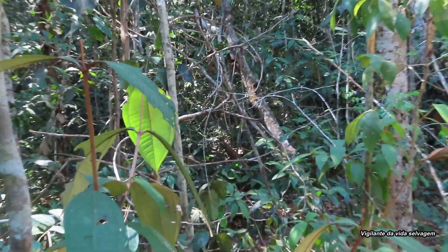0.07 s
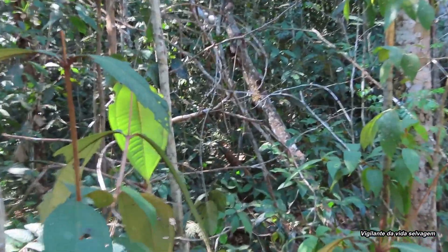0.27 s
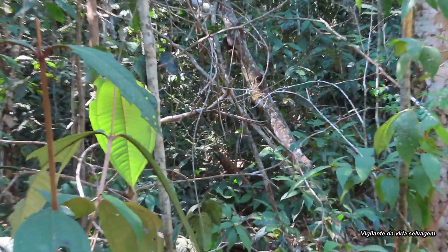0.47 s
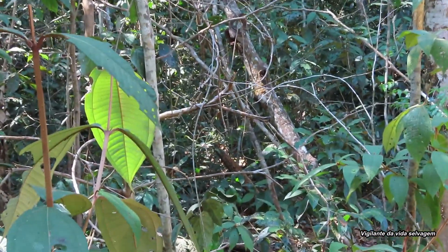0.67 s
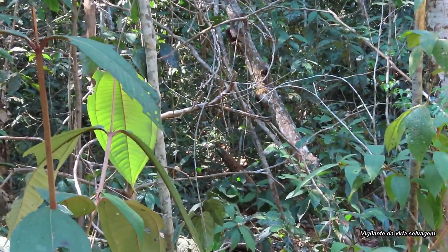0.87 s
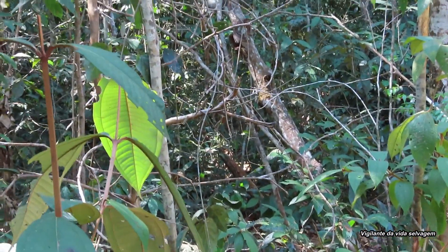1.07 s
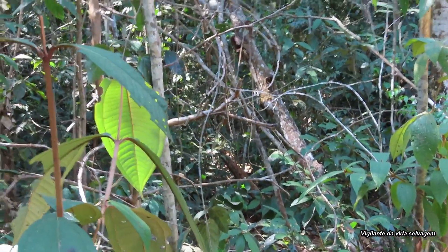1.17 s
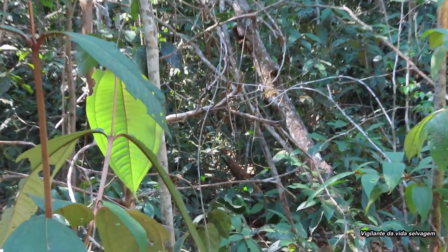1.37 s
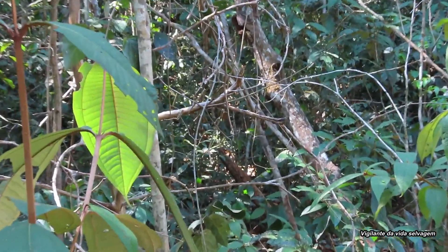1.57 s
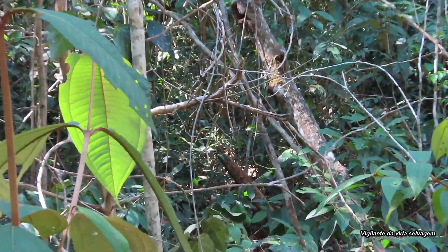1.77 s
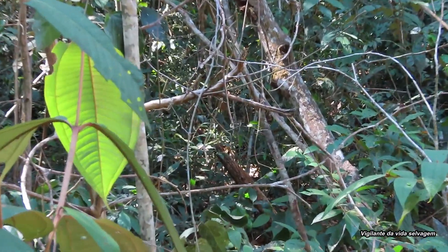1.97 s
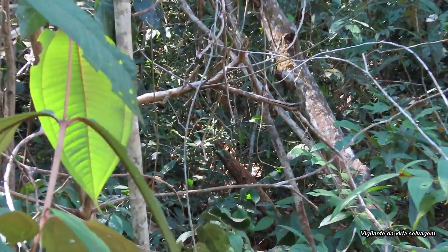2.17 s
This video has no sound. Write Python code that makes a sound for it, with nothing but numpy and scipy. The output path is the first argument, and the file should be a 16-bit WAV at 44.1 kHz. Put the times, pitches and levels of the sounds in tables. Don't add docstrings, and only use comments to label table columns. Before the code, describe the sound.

Small monkeys squeak close to a stereo microphone in echoing forest. Thin whistles rise and break into falling chirps at 0.2, 0.5 and 0.8 seconds; a loud hoarse bark follows at 0.95. Short faint whistles come around 1.1, a twig snap at 1.27, a distant call at 1.4, a harsh chirp at 1.6, a high squeak at 1.76, then weak calls until 2.25. Leaf hiss, low wind and insect tones continue.

```python
import sys
import numpy as np
from scipy import signal
from scipy.fft import rfft, irfft, next_fast_len
from scipy.io import wavfile
from scipy.ndimage import uniform_filter1d

SR = 44100
rng = np.random.default_rng(int(sys.argv[2]) if len(sys.argv) > 2 else 0)


def volts_from_decibels(level):
    exponent = np.asarray(level, float) / 20
    return 10 ** exponent


def output_pcm(signal):
    pcm = np.clip(np.atleast_2d(signal).T, -1, 1) * 32767
    wavfile.write(sys.argv[1], SR, np.round(pcm).astype(np.int16))


N = 99225

# (frequency [Hz], level [dB per Hz])
AIR_SPECTRUM = [(15, -70), (25, -11), (122, -8.5), (399, -9.5), (537, -16), (3340, -24), (5280, -27),
                (7100, -27), (15500, -58.5)]
# (frequency [Hz], likeness [0-1])
AIR_LIKENESS = [(30, 0.83), (90, 0.85), (300, 0.25), (1000, 0.95), (4000, 0.89), (9000, 0.25)]
# (width [s], boost [dB], below [Hz])
GUST_SHAPE = (0.14, 6, 410)
# (width [s], boost [dB], above [Hz])
LEAF_STIR = (0.39, 14.3, 770)
# (pitch [Hz], width [Hz], level [dB], throb rate [1/s], throb depth [0-1], steady share [0-1])
INSECT_VOICES = [
    (3253, 100, -47.5, 6.1, 0.57, 0.52),
    (7042, 200, -45.5, 290, 0.59, 0.4),
]
# (time [s], level [dB], pitch [Hz])
WIND_KNOCKS = [(.1, -47.5, 120), (0.211, -52.5, 109), (0.381, -49.5, 117), (.44, -53.5, 125),
               (.54, -46, 117), (0.599, -46, 105), (0.536, -49.5, 257), (0.588, -48.5, 294),
               (.65, -53.5, 242), (1.2, -58.5, 80), (1.28, -57, 148), (1.33, -52, 70), (1.699, -54, 93)]
# (time [s], pitch [Hz], level [dB])
EARLY_WHISTLES = [
    [(.212, 4115, -39), (.226, 4300, -37.5), (.238, 4400, -25), (.254, 4494, -29.5), (.268, 4503, -23),
     (.285, 4438, -23.5), (.294, 4450, -44), (.3, 4510, -19.5), (.311, 4030, -37)],
    [(.49, 4125, -51), (.498, 4205, -37.5), (.516, 4330, -44), (.53, 4356, -25), (.554, 4422, -29),
     (.565, 4250, -28.5)],
    [(.79, 4120, -39.5), (.82, 4250, -34.5), (.841, 4410, -27.5), (.846, 4396, -46), (.851, 4350, -25.5),
     (.862, 4366, -28), (.879, 4331, -23.5), (.89, 4420, -39), (.897, 4170, -38)],
    [(1.094, 3020, -21), (1.102, 3090, -47), (1.116, 3220, -29.5)],
    [(1.118, 3765, -41), (1.128, 3790, -29.5), (1.152, 3710, -27.5), (1.176, 3873, -35.5),
     (1.194, 3920, -38), (1.214, 4000, -34), (1.234, 4250, -34), (1.252, 4222, -37.5)],
]
LATE_WHISTLES = [
    [(1.552, 3940, -40), (1.56, 4160, -32), (1.572, 4134, -33.5), (1.584, 4200, -26), (1.59, 4206, -39),
     (1.595, 4217, -28.5), (1.608, 4270, -31.5), (1.624, 4410, -45)],
    [(1.76, 6230, -38), (1.77, 6065, -31), (1.788, 6084, -26.5), (1.802, 6070, -52), (1.817, 6080, -26.5),
     (1.83, 5960, -34.5), (1.838, 5840, -30), (1.846, 5930, -30.5), (1.856, 5660, -35)],
    [(2.105, 5760, -46), (2.115, 5685, -42.5), (2.14, 5730, -47), (2.149, 5500, -34), (2.154, 4950, -47),
     (2.162, 3100, -45)],
    [(2.24, 3800, -51), (2.246, 4000, -42), (2.25, 4130, -35)],
    [(1.904, 2543, -35), (1.914, 2510, -34), (1.92, 2460, -30), (1.926, 2485, -44)],
]
OCTAVE_LEVELS = [-13, -13, -7, -29, -7.5, -13, -26, -38, -21, -6]
OCTAVE_GROWTHS = [18, 1.7, 2, 3.4, 5.6, 4.5, 9, 14, 3, 3]
# (time [s], pitch [Hz], level [dB], roughness [0-1])
EARLY_CHIRPS = [
    [(.308, 2196, -41, 0), (.313, 1996, -16, 0.2), (.32, 1543, -22, 0.25), (.33, 1076, -34, 0)],
    [(.558, 2551, -18.5, 0.29), (.564, 2447, -17, 0), (.582, 2461, -15, 0), (.594, 2389, -22.5, 0),
     (.604, 2034, -17, 0.21), (.612, 1212, -27.5, 0), (.622, 1178, -26, 0.13)],
    [(.895, 2471, -17, 0.42), (.9, 2295, -16, 0.14), (.91, 1965, -23, 0.06), (.918, 1507, -18, 0.19),
     (.925, 1064, -19.5, 0.14)],
]
LATE_CHIRPS = [
    [(1.305, 2330, -34, 0.061), (1.316, 1908, -31.5, 0.028), (1.326, 1334, -46, 0.27),
     (1.336, 780, -36.5, 0.17)],
    [(1.625, 2382, -20.5, 1), (1.631, 1734, -21, 0.38), (1.637, 1387, -19, 0.61), (1.646, 1044, -22, 0.33)],
    [(2.158, 1866, -34.5, 0.29), (2.166, 1456, -33.5, 0.89), (2.176, 1063, -30.5, 0.28)],
]
CHIRP_TILTS = [-1, -2.5, -2, -6, -4, -1]
# (frequency [Hz], level [dB])
THROAT_SPECTRUM = [(1000, 4), (1900, -7), (2700, -11), (3600, -0.5), (5000, 0), (6800, 2), (9500, -17),
                   (11500, -26.5), (16000, -78)]
# (time [s], length [s], pitch [Hz], level [dB], roughness [0-1])
HOARSE_BARKS = [
    (0.341, 0.019, 992, -32.5, 0),
    (.946, 0.025, 850.4, -10, 0.34),
    (1.598, 0.036, 791, -29.5, 0.46),
    (1.926, .05, 1053, -23.5, 0.21),
    (2.162, 0.036, 885, -35.5, 0.35),
    (0.361, 0.067, 1800, -47, 0),
]
BARK_THROBS = [40, 80, 58, 46.3, 70, 30.4]
# (time [s], pitch [Hz], level [dB], roughness [0-1])
DISTANT_CALLS = [
    [(1.386, 2400, -20, 0.56), (1.4, 2410, -28, 0.56), (1.425, 2410, -36.5, 0.31), (1.5, 2433, -42.5, 0.07)],
    [(.725, 2290, -31, .8), (.74, 1530, -47, 1)],
]
# (level [dB], pitch [Hz], width [Hz])
TWIG_SNAP = (-34, 6800, 2700)
# (frequency [Hz], time to fall 60 dB [s])
FOREST_DECAY = [(500, 1), (1000, 1), (4500, 1), (7000, 1), (12000, 0.14)]
# (frequency [Hz], likeness [0-1])
FOREST_LIKENESS = [(700, 1), (3000, .93), (6000, 0.83), (9000, 0.13)]
# (frequency [Hz], level [dB])
MIC_RESPONSE = [(8800, 0.5), (9600, 2), (15300, 9.5), (15700, -74)]


def evened(x):
    return x / np.sqrt(np.mean(abs(x) ** 2) + 1e-20)


def read(points, hz):
    f, value = np.transpose(points)
    return np.interp(np.log(hz + 1), np.log(f + 1), value)


def add(mix, s, sound):
    part = mix[round(s * SR):][:len(sound)]
    part += sound[:len(part)]


def resonate(x, hz, width_hz):
    turn = np.exp(2j * np.pi * hz * np.arange(x.shape[-1]) / SR)
    r = np.exp(-np.pi * width_hz / SR)
    smooth = signal.lfilter([1 - r], [1, -r], x / turn)
    smooth = signal.lfilter([1 - r], [1, -r], smooth)
    return 2 * (turn * smooth).real


def unfold(rows, edge_s):
    s, *columns = np.transpose(rows)
    t = np.arange(s[0], s[-1], 1 / SR)
    ends = np.clip(np.minimum(t - s[0], s[-1] - t) / edge_s, 0, 1)
    return s[0], [np.interp(t, s, c) for c in columns], ends * np.sqrt(2)


def air():
    level_db, patchy_db, gust_s, stir_s = -48, 1.8, 0.52, 1.3
    frames, hz = N // 256 + 5, np.fft.rfftfreq(1024, 1 / SR)[:, None]
    t = np.arange(frames) * 256 / SR
    a, b, c, d, patches = rng.standard_normal((frames, 513, 5)).T
    patches = uniform_filter1d(patches, size=8, axis=0)
    patches = evened(uniform_filter1d(patches, size=12, axis=1))

    width_s, boost_db, below_hz = GUST_SHAPE
    gust = boost_db * np.exp(-((t - gust_s) / width_s) ** 2) / (1 + (hz / below_hz) ** 4)
    width_s, boost_db, above_hz = LEAF_STIR
    stir = boost_db * np.exp(-((t - stir_s) / width_s) ** 2) / (1 + (above_hz / (hz + 1)) ** 2)

    same = read(AIR_LIKENESS, hz)
    left = a + 1j * b
    right = same * left + np.sqrt(1 - same ** 2) * (c + 1j * d)
    z = np.array([left, right]) * volts_from_decibels(read(AIR_SPECTRUM, hz) + patchy_db * patches + gust + stir)
    x = signal.istft(z, nperseg=1024, noverlap=768)[1][:, :N]
    return volts_from_decibels(level_db) * x / np.sqrt(np.mean(x[:, :9000] ** 2))


def insect(hz, width_hz, db, rate, depth, steady):
    same, early_db = 0.67, -7.5
    a, b, drift = rng.standard_normal((3, N))
    drift = evened(uniform_filter1d(drift, size=2000))
    right = same * a + np.sqrt(1 - same ** 2) * b
    buzz = evened(resonate(np.array([a, right]), hz, width_hz))
    core = np.sqrt(2) * np.sin(2 * np.pi * np.cumsum(hz * (1 + 0.002075 * drift)) / SR)
    throb = 1 + depth * np.sin(2 * np.pi * np.cumsum(rate * (1 + 0.45 * drift)) / SR)
    swell = volts_from_decibels(db + early_db * np.clip(1 - 2 * np.arange(N) / SR, 0, 1))
    return swell * throb * (steady * core + (1 - steady) * buzz)


def buffet(s, db, hz):
    half_s = 0.035
    t = np.arange(0, 2 * half_s, 1 / SR)
    return s - half_s, volts_from_decibels(db) * 2 * np.hanning(len(t)) * np.sin(2 * np.pi * hz * t)


def whistle(rows, octave_db, growth_db):
    start, (hz, db), ends = unfold(rows, edge_s=0.0023)
    phase = 2 * np.pi * np.cumsum(uniform_filter1d(hz, size=200)) / SR
    octave = volts_from_decibels(octave_db + growth_db * np.linspace(-.5, .5, len(hz))) * np.sin(2 * phase)
    third = volts_from_decibels(db - 20) * np.sin(3 * phase)
    return start, ends * volts_from_decibels(db) * (np.sin(phase) + octave + third)


def forest(x):
    early_db, early_s, mottle_db = -3, 0.02, 3.5
    taps = np.zeros((2, SR))
    at = np.arange(100, SR - 20, 20) + rng.integers(0, 20, (2, (SR - 101) // 20))
    np.put_along_axis(taps, at, rng.choice([-1., 1.], at.shape), 1)
    hz, t, z = signal.stft(taps, SR, nperseg=256)
    late = volts_from_decibels(-60 * t / read(FOREST_DECAY, hz)[:, None])
    early = volts_from_decibels(early_db + 14.5) * np.exp(-t / early_s)
    spread = np.array([np.ones_like(hz), np.sqrt(1 - read(FOREST_LIKENESS, hz))])
    mottle = evened(uniform_filter1d(rng.standard_normal(z.shape[1:]), size=6))
    fade = (late + early) * spread[:, :, None] * volts_from_decibels(mottle_db * mottle)
    mid, side = signal.istft(z * fade, SR, nperseg=256)[1]
    tail = np.array([mid + side, mid - side]) / np.linalg.norm(mid)
    return signal.fftconvolve(x[None], tail, axes=1)[:, :N]


def chirp(rows, tilt_db):
    start, (hz, db, rough), ends = unfold(rows, edge_s=0.00081)
    wobble = evened(uniform_filter1d(rng.standard_normal(len(hz)), size=40))
    glide = uniform_filter1d(hz, size=100) * (1 + 0.089 * rough * wobble)
    phase = 2 * np.pi * np.cumsum(glide) / SR

    k = np.arange(1, 25)[:, None] / 2
    share = np.where(k % 1, volts_from_decibels(-7.5) * rough, 1) * volts_from_decibels(tilt_db * np.maximum(k - 2, 0))
    share = share * (k * hz < 15000) * (k * hz > 700)
    partials = share * volts_from_decibels(read(THROAT_SPECTRUM, k * hz)) * np.cos(k * phase + k ** 2)
    tone = evened(partials.sum(0))

    f = np.fft.rfftfreq(len(hz), 1 / SR)
    breath = rfft(rng.standard_normal(len(hz)))
    hiss = evened(irfft(breath * volts_from_decibels(read(THROAT_SPECTRUM, f)) * (f > 900), len(hz)))
    return start, ends * volts_from_decibels(db) * ((1 - rough) * tone + rough * hiss) / np.sqrt(2)


def bark(start, length, hz, db, rough, throb_hz):
    rise_s, sag, throb_depth = 0.00654, 0.1, 0.7
    fade_db, puff_db, puff_fade_db = -2.5, -6, -16
    t = np.arange(0, length + .01, 1 / SR)
    a, b, c = rng.standard_normal((3, len(t) + 2000))

    cycle = (throb_hz * np.maximum(t - rise_s / 2, 0)) % 1
    throb = 1 + throb_depth * np.sin(2 * np.pi * cycle ** .5)
    tone = throb * np.sin(2 * np.pi * hz * np.cumsum(1 + sag * (.5 - t / length)) / SR)
    low = evened(resonate(resonate(a, hz, 1520), 0.93 * hz, 1080 * rough + 40))[2000:]
    upper = evened(resonate(b, 2.38 * hz, 510))[2000:]
    puff = resonate(resonate(resonate(c, 4540, 5400), 4800, 7600), 2800, 6400)
    puff = volts_from_decibels(puff_db + puff_fade_db * t / length) * evened(puff)[2000:]

    shape = np.clip(t / rise_s, 0, 1) ** 2 * np.clip((length + 0.0095 - t) / 0.036, 0, 1)
    voice = (1 - rough) * tone + rough * (low + upper) + puff
    return start, volts_from_decibels(db + fade_db * t / length) * shape * voice


def far_call(rows):
    call = np.zeros(N)
    add(call, *chirp(rows, tilt_db=-1))
    return resonate(call, hz=5200, width_hz=4000)


def twig():
    db, hz, width_hz = TWIG_SNAP
    crack = evened(resonate(rng.standard_normal(220), hz, width_hz))
    return 1.273, volts_from_decibels(db) * np.hanning(220) * crack


def scene():
    near_wet_db, thin_wet_db = -2.5, -3.5
    thin, near, wind = np.zeros((3, N))
    for row in WIND_KNOCKS:
        add(wind, *buffet(*row))
    for row in zip(EARLY_WHISTLES + LATE_WHISTLES, OCTAVE_LEVELS, OCTAVE_GROWTHS):
        add(thin, *whistle(*row))
    for row in zip(EARLY_CHIRPS + LATE_CHIRPS, CHIRP_TILTS):
        add(near, *chirp(*row))
    for row, throb_hz in zip(HOARSE_BARKS, BARK_THROBS):
        add(near, *bark(*row, throb_hz))
    add(near, *twig())
    far = sum(far_call(rows) for rows in DISTANT_CALLS)
    scattered = forest(volts_from_decibels(near_wet_db) * near + volts_from_decibels(thin_wet_db) * thin + far)
    insects = sum(insect(*row) for row in INSECT_VOICES)
    return thin + near + wind + scattered + air() + insects


def top_cut(x):
    return signal.sosfilt(signal.butter(12, 15630, fs=SR, output="sos"), x)


def record(dry):
    size = next_fast_len(N + 2048)
    response = volts_from_decibels(read(MIC_RESPONSE, np.fft.rfftfreq(size, 1 / SR)))
    heard = irfft(rfft(dry, size) * response, size)[:, :N]
    return top_cut(heard)


dry = scene()
out = record(dry)
output_pcm(out)
```